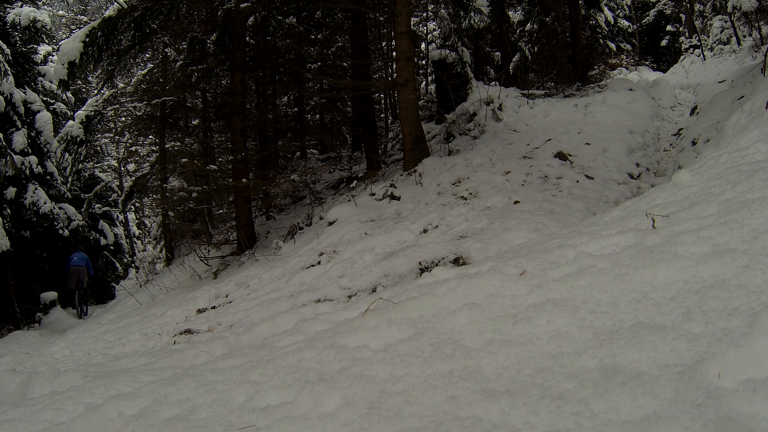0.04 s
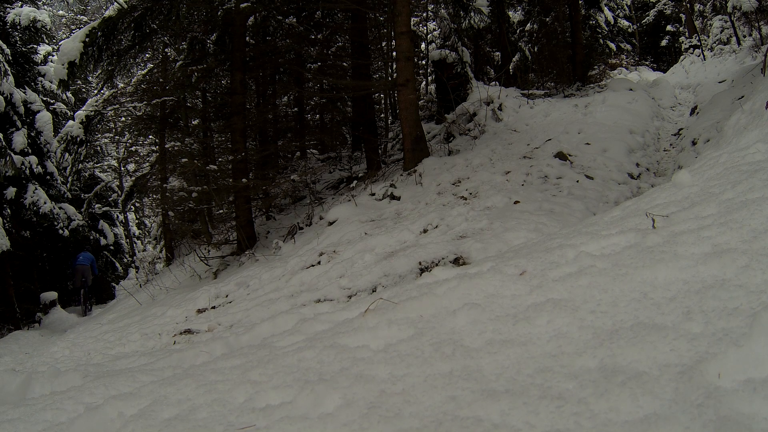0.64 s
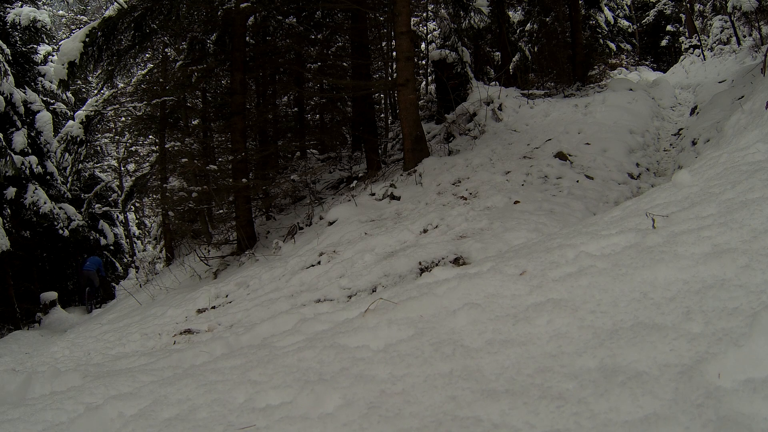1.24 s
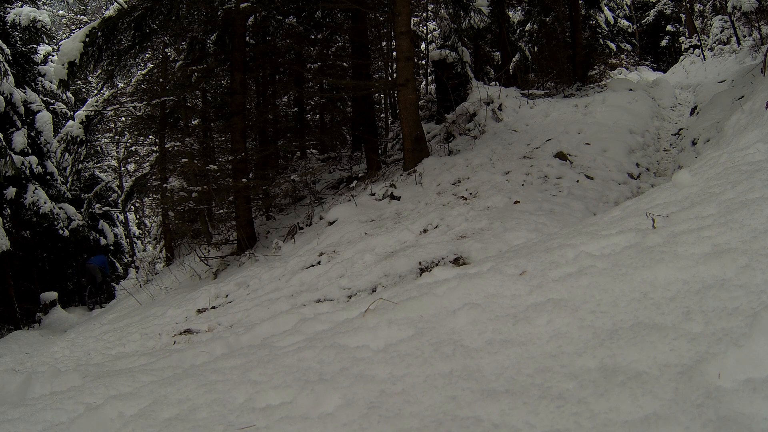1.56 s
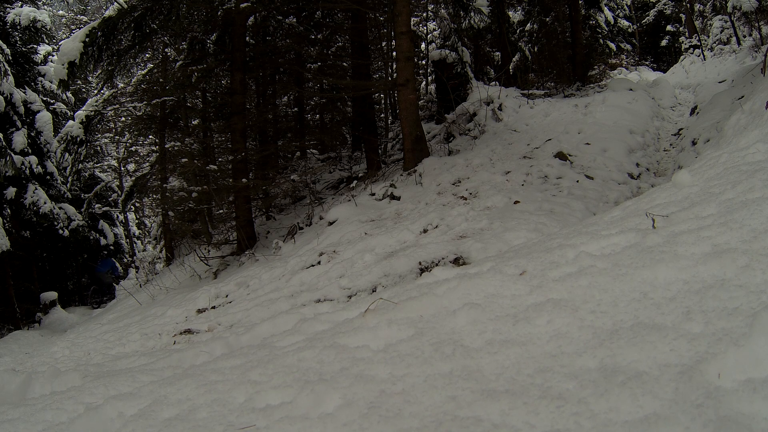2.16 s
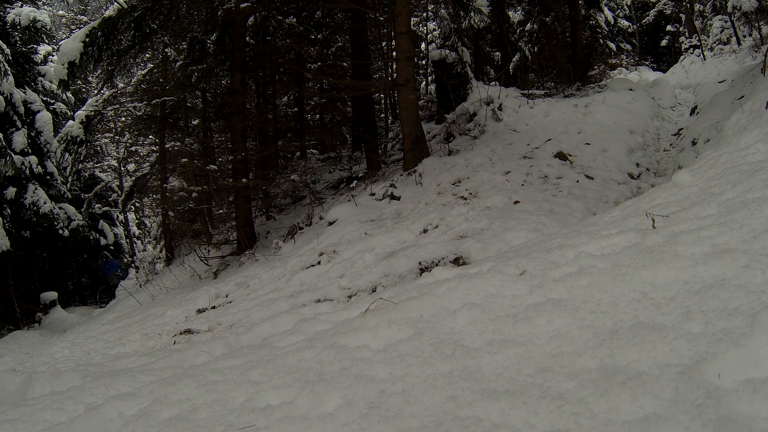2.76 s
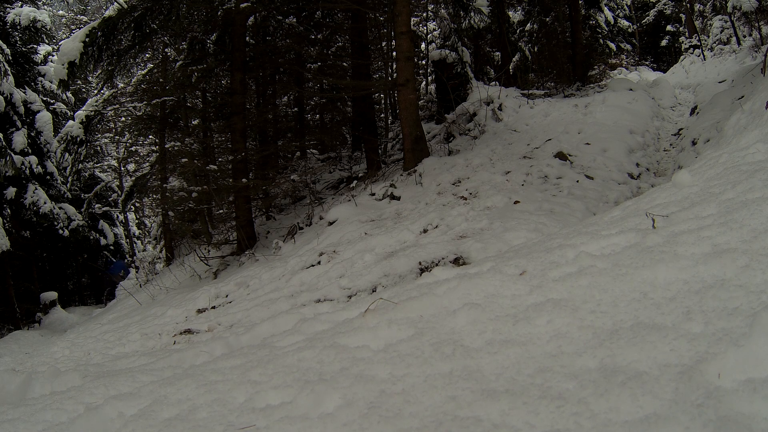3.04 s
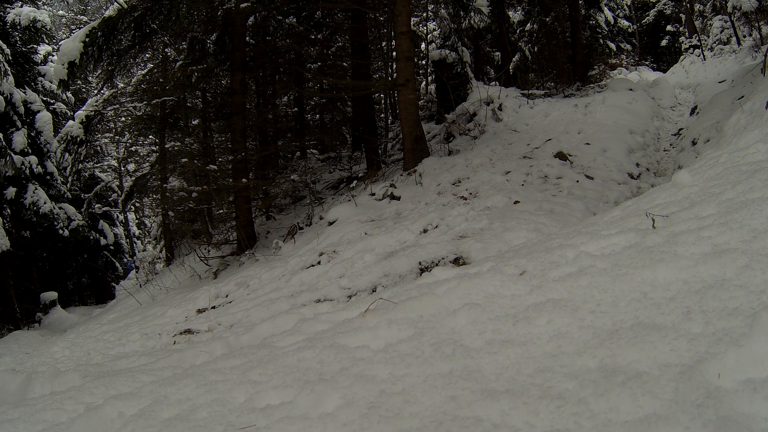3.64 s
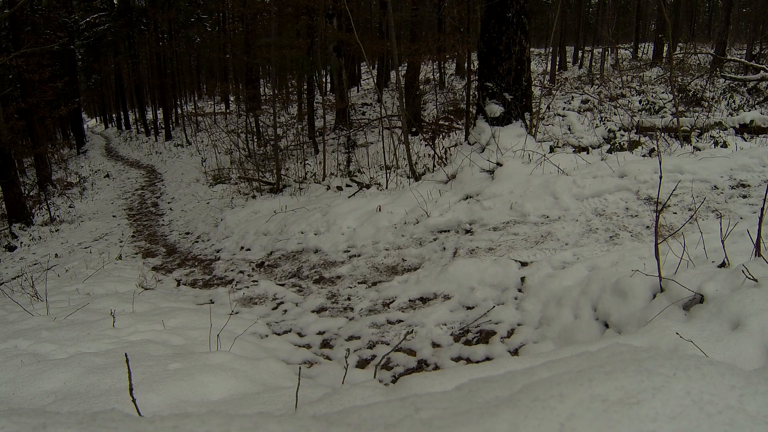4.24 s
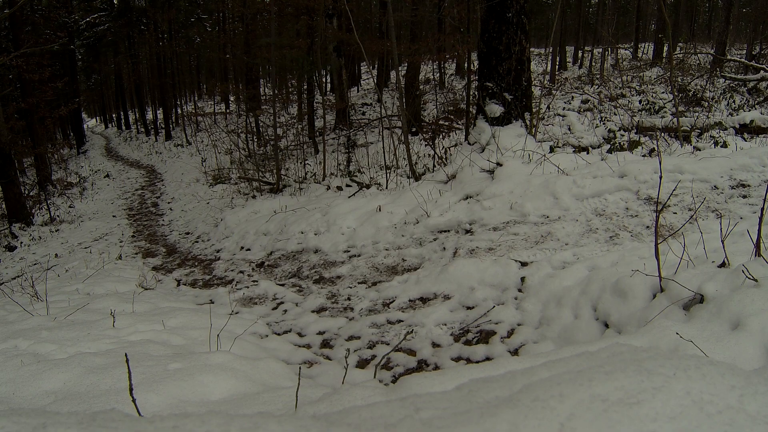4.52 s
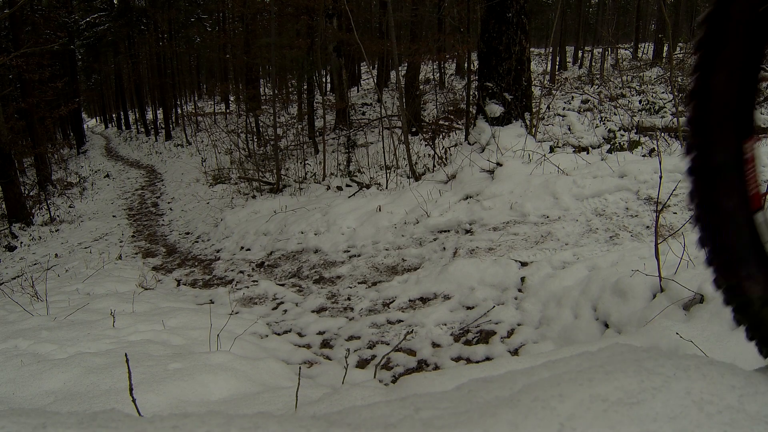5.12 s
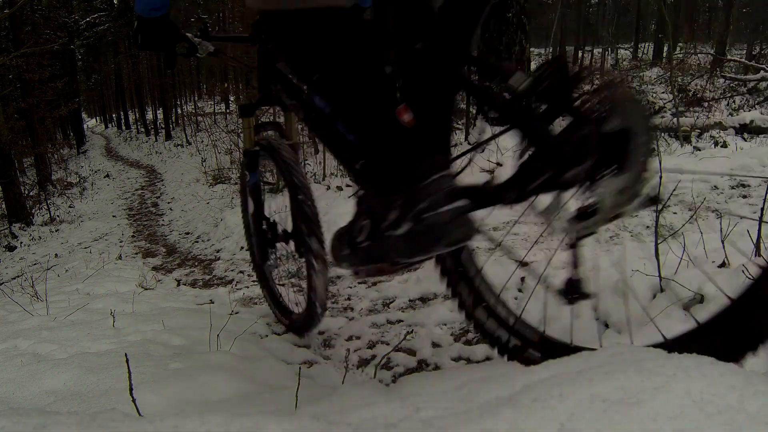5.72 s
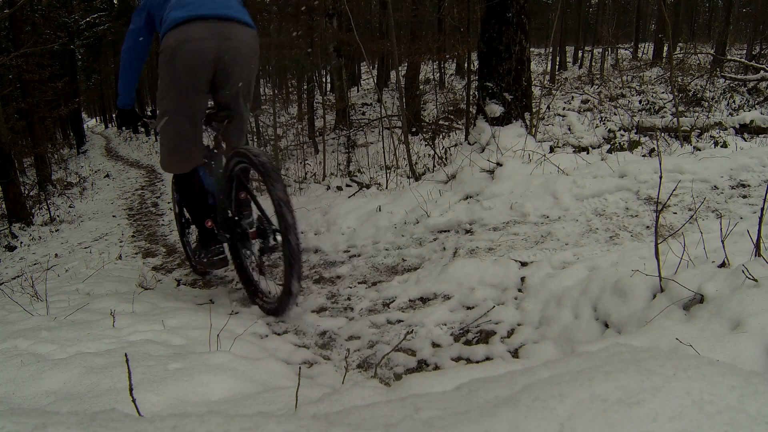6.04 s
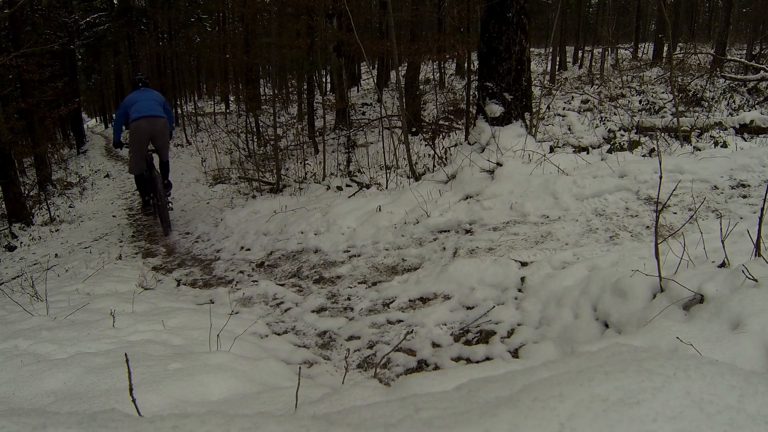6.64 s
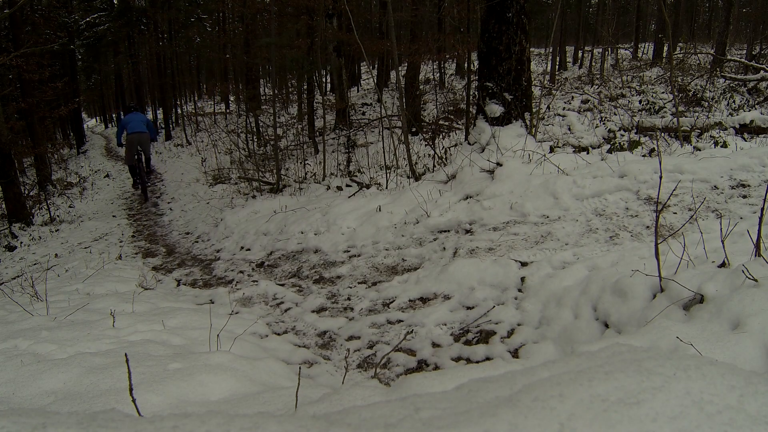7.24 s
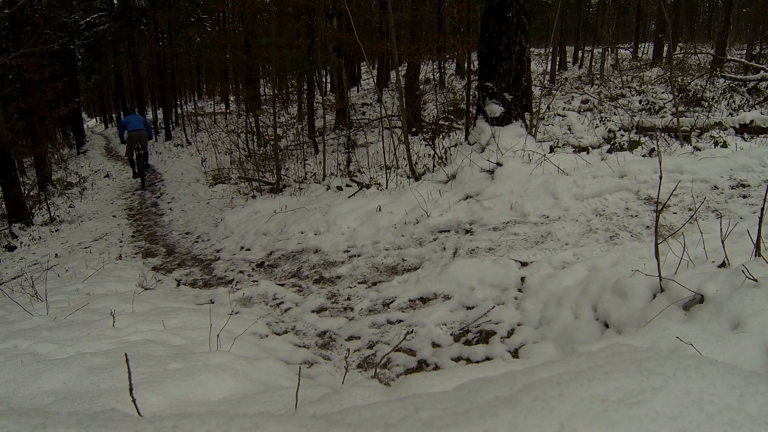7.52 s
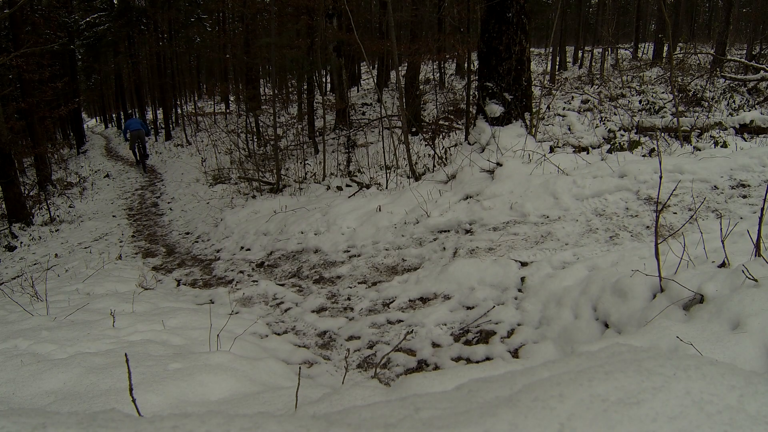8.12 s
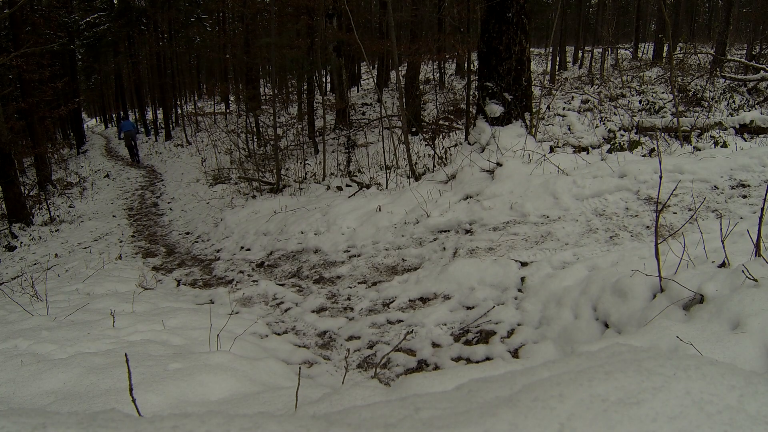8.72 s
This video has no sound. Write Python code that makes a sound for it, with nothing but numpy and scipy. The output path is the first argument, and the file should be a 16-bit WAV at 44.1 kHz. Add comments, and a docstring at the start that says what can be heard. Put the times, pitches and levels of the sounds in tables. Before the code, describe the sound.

A soft, low hush of still forest air runs throughout. A very faint high trill sounds from about 0.2 to 1.1 seconds, and a distant mountain bike rattles weakly until nearly 3 seconds. At about 3.8 seconds, nearby tyres start crunching through deep snow, growing louder, with many muffled pops and a couple of light clacks. From 5.3 to 6 seconds the bike passes right beside the microphone: the wheels land in several deep thumps, the heaviest near 5.9, while the chain slaps and jingles and the frame and brake disc ring briefly. A short, hollow tyre drone, ticks of grit and two softer thumps follow until about 6.5 seconds. The bike then coasts away on packed snow, its crackling quieter, with a run of light chain clacks around 7.5 to 8.4 seconds and soft crunches until the end, near 9 seconds.

```python
"""A quiet winter forest, a thin trill and a mountain bike rattling faintly far away; then a bike rolls up on
snow, thuds over a hump right beside the listener and coasts off down a trodden track.
The crunch is a mass of tiny fractures under the tread, with pops where pockets of snow collapse.
The wheels land with deep, sagging thumps; chain and frame clack, jingle and ring at the bumps."""
import sys
import numpy as np
from scipy import signal
from scipy.fft import rfft, irfft
from scipy.io import wavfile
from scipy.ndimage import uniform_filter1d

SR = 44100
rng = np.random.default_rng(int(sys.argv[2]) if len(sys.argv) > 2 else 0)


def transcribe(signal):
    """Save signal, clipped to [-1, 1], as a 16-bit WAV file at the path in sys.argv[1]."""
    frames = np.atleast_2d(signal).T
    limited = np.clip(frames, -1, 1)
    pcm = np.round(limited * 32767).astype(np.int16)
    wavfile.write(sys.argv[1], SR, pcm)


N = 386757
TIME = np.arange(N) / SR

# chain and frame knocking at the hard bumps:
# (time [s], clack level [dB], clack pitch [Hz], jingle level [dB], ring level [dB], ring centre [Hz])
KNOCKS = [(4.186, -44, 1750, -57, -56, 3500), (4.461, -39, 1860, -66, -47, 3000),
          (5.269, -32, 1900, -44, -52, 5150), (5.31, -35, 1610, -39.5, -33, 3180),
          (5.354, -30, 1890, -41, -42.5, 5150), (5.454, -38, 1900, -46, -48, 5000),
          (5.491, -44, 1800, -57, -56, 5000), (5.52, -24, 1650, -41.5, -34, 3200),
          (5.562, -37, 1750, -50.5, -50, 5400), (5.77, -31, 1700, -39, -44, 4900),
          (5.801, -26, 2300, -47, -45, 3200), (5.824, -30, 1600, -44, -48, 3200),
          (5.886, -20, 1600, -42, -30, 3600), (5.894, -24.5, 1600, -45, -27, 3670),
          (5.912, -38, 1900, -38, -46, 5150), (5.938, -28, 1900, -35, -38, 5400),
          (5.95, -21.5, 1950, -42, -26, 3020), (6.044, -28, 2350, -37.5, -29, 4500),
          (6.203, -31.5, 1650, -56, -50, 4900), (6.393, -34, 1750, -60, -45, 3600),
          (6.777, -40, 1740, -72, -56, 2900), (7.56, -41.5, 1800, -57, -57, 5400),
          (7.647, -43, 1900, -61, -47.5, 3550), (7.72, -43.5, 1900, -68, -56, 5400),
          (7.799, -40.5, 1900, -68, -49, 3570), (7.889, -35, 1950, -55, -44, 3550),
          (7.973, -37.5, 2010, -55, -43, 3550), (8.048, -43, 1900, -61, -52, 3550),
          (8.413, -43, 1800, -70, -52, 3550)]
# tone of the crust crackling on fresh snow: (frequency [Hz], relative level [dB])
FRESH_CRUST = [(600, -16), (1300, -9), (1550, 0), (1750, 3.5), (2150, -4.5), (2550, -11), (3150, -10),
               (3450, -22.5), (3900, -31.5), (5500, -42), (12000, -63)]


def from_db(db):
    """Decibels to gain."""
    return 10 ** (np.asarray(db) / 20)


def rms_one(x):
    """Scale to unit rms."""
    return x / np.sqrt(np.mean(x ** 2) + 1e-20)


def add(out, s, sound):
    """Mix a short sound in at time s."""
    i = max(0, round(s * SR))
    out[i:i + len(sound)] += sound[:N - i]


def butter(x, order, hz, kind="band"):
    """Butterworth filter, band-pass by default."""
    return signal.sosfilt(signal.butter(order, hz, kind, fs=SR, output="sos"), x)


def colour(x, spectrum, size=4096):
    """Minimum-phase EQ through (Hz, dB) points; white noise keeps its power."""
    hz, db = np.transpose(spectrum)
    grid = np.maximum(np.fft.rfftfreq(size, 1 / SR), 1)
    gain = from_db(np.interp(np.log(grid), np.log(hz), db))
    cepstrum = irfft(np.log(gain))
    cepstrum[1:size // 2] *= 2
    cepstrum[size // 2 + 1:] = 0
    response = irfft(np.exp(rfft(cepstrum)))
    return signal.oaconvolve(x, response / np.linalg.norm(response))[:N]


def shifted(spectrum, ratio):
    """The same spectrum, moved in pitch."""
    return [(hz * ratio, db) for hz, db in spectrum]


def drift(per_s):
    """Smooth random wander of rms 1."""
    knots = rng.standard_normal(N // 20)
    return rms_one(np.interp(TIME * per_s, np.arange(len(knots)), knots))


def wandering(x, spectrum, octaves=0.11):
    """An EQ that slides up and down at random: each clump of snow breaks at its own pitch."""
    place = np.clip(drift(per_s=60), -1, 1)
    return sum(colour(x * np.maximum(0, 1 - abs(place - k)), shifted(spectrum, 2 ** (k * octaves)))
               for k in (-1, 0, 1))


def grains(per_s, spread_db, hiss):
    """Random tiny clicks, many weak and a few strong, merging into a hiss; rms 1."""
    sizes = from_db(spread_db * np.minimum(rng.exponential(1, N), 4))
    clicks = (rng.random(N) < per_s / SR) * sizes * rng.choice([-1, 1], N)
    return rms_one(rms_one(clicks) + hiss * rng.standard_normal(N))


def swell(t, rise_s, decay):
    """Envelope of peak 1: a soft attack on the given decay curve."""
    shape = (1 - np.exp(-(t / rise_s) ** 2)) * decay
    return shape / shape.max()


def burst(rise_s, decay_s, tail_db, tail_s):
    """A rush of tiny contacts that swells, dies quickly and leaves a weak tail."""
    t = TIME[:SR // 6]
    decay = np.exp(-t / decay_s) + from_db(tail_db) * np.exp(-t / tail_s)
    return swell(t, rise_s, decay) * rng.standard_normal(len(t))


def ring(t, hz, t60):
    """A struck mode: a dying sine."""
    return np.sin(2 * np.pi * hz * t) * from_db(-60 * t / t60)


def forest_air(level_db=-54):
    """The bed: still air, a soft hush weighted to the lows."""
    # tone of the hush: (frequency [Hz], relative level [dB])
    hush = [(20, 1.5), (50, 2.5), (100, -6.0), (280, -14.0), (430, -20.0), (900, -22.5), (1350, -28.5),
            (1800, -28.5), (2400, -31.5), (2950, -29.5), (3700, -34), (7200, -39.5), (7950, -35),
            (8700, -42), (12500, -44.5), (15000, -47)]
    return from_db(level_db) * colour(rng.standard_normal(N), hush)


def whines(flutter_db=1.5):
    """A faint high hiss and a brief low whine: narrow bands of fluttering noise."""
    # rushes in the stillness: (start [s], end [s], centre [Hz], width [Hz], level [dB])
    rushes = [(1.127, 2.05, 6700, 1800, -75), (2.37, 2.47, 1020, 90, -72.5)]
    out = np.zeros(N)
    for start, end, hz, width, db in rushes:
        gate = uniform_filter1d(1.0 * ((TIME > start) & (TIME < end)), size=900)
        flutter = from_db(flutter_db * drift(per_s=40))
        rush = butter(rng.standard_normal(N), 2, [hz - width / 2, hz + width / 2])
        out += from_db(db) * gate * rms_one(flutter * rush)
    return out


def trill(start_s=0.23, end_s=1.13, pitch_hz=4490, waver_hz=60, pips_per_s=10.1, level_db=-76):
    """A loose chain of soft, high pips."""
    beat = np.pi * pips_per_s * (TIME - start_s) + .5 * drift(pips_per_s)
    pips = np.sqrt(abs(np.sin(beat))) * (TIME > start_s) * (TIME < end_s)
    hz = pitch_hz + waver_hz * drift(per_s=150)
    return from_db(level_db) * pips * np.sin(2 * np.pi * np.cumsum(hz) / SR)


def far_bike(band_ratio=1.39, frame_hz=1760, frame_width_hz=120, frame_db=2.5):
    """Each jolt is a soft swell of small ticks, blurred by distance; the frame rings through them."""
    # jolts and skids: (time [s], level [dB], centre [Hz], rise [s], decay [s])
    jolts = [(.02, -69.5, 2000, 0.0074, 0.2), (.311, -63, 1930, 0.0016, .022),
             (.538, -58, 2000, 0.0017, .009), (.556, -67, 1900, .002, .024),
             (1.235, -70, 1880, .012, 0.066), (1.58, -66.5, 2370, 0.1, 0.068),
             (2.415, -59.5, 745, .04, 0.025), (2.6, -68, 2350, 0.015, 0.037)]
    out, t = np.zeros(N), TIME[:SR]
    ticks = grains(per_s=220, spread_db=2, hiss=0.65)
    for s, db, hz, rise_s, decay_s in jolts:
        rattle = rms_one(butter(ticks[round(s * SR):][:SR], 2, [hz / band_ratio, hz * band_ratio]))
        add(out, s, from_db(db) * swell(t, rise_s, np.exp(-t / decay_s)) * rattle)
    frame = signal.iirpeak(frame_hz, frame_hz / frame_width_hz, fs=SR)
    return out + from_db(frame_db) * signal.lfilter(*frame, out)


def tree_echo(x, send_db=-17, delay_s=.008, decay_s=0.042):
    """Trunks scatter back a weak, dull tail; the snow swallows the rest."""
    t = TIME[:SR // 2]
    tail = rng.standard_normal(len(t)) * np.exp(-t / decay_s) * (t > delay_s)
    dull_tail = butter(tail / np.linalg.norm(tail), 1, [200, 3500])
    return from_db(send_db) * signal.oaconvolve(x, dull_tail)[:N]


def tread_drumming(band_hz=(136, 293)):
    """Off the hump, the rear tyre's knobs slap the hard track unevenly: a short, hollow drone."""
    # fader curve of the drone: (time [s], level [dB])
    fader = [(5.86, -77), (5.93, -38), (6.04, -37.5), (6.15, -52.5), (6.18, -41.5), (6.25, -40.5),
             (6.42, -54), (6.6, -75)]
    times, db = np.transpose(fader)
    level = from_db(np.interp(TIME, times, db)) * (TIME > times[0])
    return level * rms_one(butter(rng.standard_normal(N), 3, band_hz))


def grit(cycles=3.5, gain=2):
    """Grit flicks against the bike; each grain hits once and is dead within a few cycles."""
    # dry ticks: (time [s], level before gain [dB], pitch [Hz])
    ticks = [(5.7252, -27, 4150), (5.966, -27, 5000), (6.301, -34.5, 4500), (6.399, -39, 4600),
             (6.489, -41, 4400)]
    out = np.zeros(N)
    for s, db, hz in ticks:
        add(out, s, gain * from_db(db) * ring(TIME[:SR // 100], hz, cycles / hz))
    return out


def brake_disc(knock_s=5.801):
    """One knock sets wheel and brake disc singing."""
    # their modes: (frequency [Hz], level [dB], t60 [s])
    modes = [(506, -31.5, 0.25), (2175, -33.5, 0.24), (2370, -25.5, 0.042), (3150, -40, 0.21),
             (3456, -47, 0.14), (8240, -48, .08)]
    out = np.zeros(N)
    add(out, knock_s, sum(from_db(db) * ring(TIME[:SR // 2], hz, t60) for hz, db, t60 in modes))
    return out


def frame_ring(focus_octaves=0.084, spread_db=1, lag_s=.002, detune=.012, chatter=0.5):
    """Where the chain lands decides which modes ring most; still touching, it detunes and roughens them."""
    # modes of the frame: (frequency [Hz], relative level [dB], t60 [s])
    modes = [(2900, -3, 0.061), (3210, -2, 0.038), (3540, -2, 0.029), (3699, -6, 0.042), (3960, -3, 0.018),
             (4420, -5.5, 0.051), (4930, -3, 0.05), (5170, 1.5, 0.024), (5420, -6.5, 0.028),
             (5510, -13, 0.076), (7780, -4, 0.036), (8360, 1, 0.033), (10700, -3, 0.028)]
    out, t = np.zeros(N), TIME[:SR // 8]
    for hz, db, t60 in modes:
        mode = np.zeros(N)
        for s, _, _, _, ring_db, centre_hz in KNOCKS:
            share = 1 / np.hypot(1, np.log2(hz / centre_hz) / focus_octaves)
            strength = from_db(ring_db + db + spread_db * rng.standard_normal()) * rng.choice([-1, 1])
            detuned_hz = hz * (1 + detune * rng.standard_normal())
            add(mode, s + lag_s, share * strength * ring(t, detuned_hz, t60))
        out += mode * (1 + chatter * drift(per_s=400)) / np.hypot(1, chatter)
    return out


def chain_slap(tone_peak_hz=1750, links_per_s=4500, trim_db=-0.74):
    """Chain links land in a quick, ragged run: a dull clack and a bright jingle."""
    # tones of the clack and the jingle: (frequency [Hz], relative level [dB])
    clack_tone = [(300, -19), (1100, -10), (1750, 4.5), (2300, -1.5), (2800, -6), (3520, -9.5), (4500, -24),
                  (5350, -21), (6800, -37), (15000, -54)]
    jingle_tone = [(1500, -50), (3500, 4.5), (5200, 8.5), (6800, -2), (8300, 11), (9400, -1.5),
                   (10500, 0.5), (12500, -11), (15000, -14)]
    dull, bright = np.zeros((2, N))
    for s, clack_db, clack_hz, jingle_db, _, _ in KNOCKS:
        clack = from_db(clack_db) * burst(rise_s=0.0016, decay_s=0.0018, tail_db=-21.5, tail_s=0.028)
        add(dull, s, colour(clack, shifted(clack_tone, clack_hz / tone_peak_hz)))
        jingle = from_db(jingle_db) * burst(rise_s=0.0028, decay_s=0.0023, tail_db=-30.5, tail_s=0.026)
        links = rng.random(len(jingle)) < links_per_s / SR
        add(bright, s - .001, jingle * rms_one(links + 0.12))
    return from_db(trim_db) * (dull + colour(bright, jingle_tone))


def wheel_thumps(sag=0.4, sag_s=.015, rise_s=0.0042, thud_db=-11):
    """A deep bounce whose pitch sags as the load eases; the casing booms and squashed snow thuds."""
    # wheels landing: (time [s], level [dB], mid-sweep pitch [Hz], t60 [s], casing boom level [dB])
    landings = [(5.306, -19.5, 49.7, 0.065, -23.5), (5.362, -26, 34, 0.15, -50),
                (5.516, -15, 46.6, 0.12, -28), (5.733, -18, 44, 0.16, -42), (5.8794, -8.5, 54.7, 0.12, -38),
                (6.17, -33, 45, .1, -42), (6.225, -28, 38, 0.14, -44)]
    # tone of squashed snow: (frequency [Hz], relative level [dB])
    thud_tone = [(60, -12.5), (160, 3.5), (260, -1.5), (360, -5), (520, -3.5), (1000, -7.5), (1700, -3),
                 (2600, -29), (5000, -52)]
    out, squash = np.zeros((2, N))
    t = TIME[:SR // 3]
    for s, db, hz, t60, boom_db in landings:
        sagging_hz = hz * (1 - sag + 2 * sag * np.exp(-t / sag_s))
        bounce = np.sin(2 * np.pi * np.cumsum(sagging_hz) / SR)
        add(out, s, from_db(db) * swell(t, rise_s, from_db(-60 * t / t60)) * bounce)
        add(out, s + rise_s, from_db(boom_db) * ring(t, hz=144, t60=0.063))
        thud = burst(rise_s=0.0022, decay_s=0.013, tail_db=-12, tail_s=0.023)
        add(squash, s, from_db(db + thud_db) * thud)
    return out + colour(squash, thud_tone)


def grind_db(s):
    """How hard the tyres grind the snow at time s, as heard from the trailside."""
    # fader curve of the grind: (time [s], level [dB])
    fader = [(3.85, -57), (3.92, -57), (4.01, -51), (4.15, -48.5), (4.26, -48.5), (4.38, -47.5),
             (4.52, -47), (4.66, -44.5), (5.07, -44), (5.45, -47.5), (5.66, -48), (5.73, -43.5),
             (5.86, -47), (5.94, -39), (6.01, -41.5), (6.14, -48.5), (6.41, -47), (6.75, -51.5),
             (7.65, -54), (8.05, -54), (8.52, -57.5), (8.77, -51.5)]
    return np.interp(s, *np.transpose(fader))


def small_pops(start_s=4.0, end_s=5.3, per_s=36, over_grind_db=9, centre_hz=850, spread_octaves=0.84):
    """Small pockets give way in deep snow, one at random in each beat: rows of (s, dB, Hz)."""
    beats = np.arange(np.ceil((end_s - start_s) * per_s))
    times = start_s + (beats + rng.random(len(beats))) / per_s
    return [(s, grind_db(s) + over_grind_db, centre_hz * 2 ** (spread_octaves * rng.standard_normal()))
            for s in times[times < end_s]]


def snow_pops(width_cycles=0.33, crumble_db=-16, after_s=0.003014, muffle_hz=1520):
    """A collapsing pocket is one quick suck and push of air, muffled by snow; then the crust crumbles."""
    # the biggest pockets under the tread: (time [s], level [dB], pitch [Hz])
    big_pops = [(3.99, -31, 520), (4.036, -34, 900), (4.0737, -24, 1030), (4.103, -24, 1600),
                (4.1458, -19.5, 650), (4.1591, -19, 860), (4.1886, -20.5, 620), (4.285, -26.5, 730),
                (4.3581, -18, 1550), (4.41, -28, 1300), (4.431, -26.5, 454), (4.4627, -13, 2000),
                (4.473, -23.5, 600), (4.5585, -27, 700), (4.601, -22.5, 1710), (4.72, -27, 820),
                (4.7505, -17, 716), (4.7616, -15.5, 636), (4.8012, -15, 1080), (4.8079, -13.5, 640),
                (4.8443, -13.5, 730), (4.8597, -19.5, 597), (4.903, -26.5, 418), (5.029, -20, 810),
                (5.0921, -17, 760), (5.167, -28, 500), (5.177, -26.5, 603), (5.2247, -17, 815),
                (5.306, -9.5, 760), (5.311, -12, 750), (5.736, -14, 623), (5.739, -13, 293),
                (5.746, -9.5, 1340), (5.9541, -11.5, 835), (5.992, -18.5, 900), (6.0222, -17.5, 860),
                (6.2671, -18, 1350), (6.337, -18, 1200), (6.3955, -19, 1450), (6.412, -19, 1200),
                (6.733, -30.5, 800)]
    air, crumbs = np.zeros((2, N))
    t = np.arange(-SR // 200, SR // 200) / SR
    pops = big_pops + small_pops()
    # the snow gives way a second time, softer and lower
    after_pops = [(s + after_s * (.5 + rng.random()), db - 10, hz * 0.72) for s, db, hz in pops]
    for s, db, hz in pops + after_pops:
        pulse = np.sin(2 * np.pi * hz * t) * np.exp(-.5 * (hz * t / width_cycles) ** 2)
        add(air, s + t[0], from_db(db) * pulse)
        crumble = burst(rise_s=0.00015, decay_s=0.0011, tail_db=-14.5, tail_s=0.014)
        add(crumbs, s - .001, from_db(db + crumble_db) * crumble)
    return butter(air, 1, muffle_hz, "low") + colour(crumbs, FRESH_CRUST)


def distance_db(s, pass_s=5.895, closest_m=0.47, speed_m_per_s=3.42):
    """Level change with distance: 0 as the rear wheel goes by, negative either side."""
    return -20 * np.log10(np.hypot(1, speed_m_per_s * (s - pass_s) / closest_m))


def tyres(start_s=3.838, hump_s=(5.57, 5.71), clump_db=2.5):
    """The tread breaks snow in clumps, each lifting crunch, crackle and spray, over a ground rumble."""
    # a tyre breaking right through the crust: (time [s], crunch level [dB], crackle level [dB], decay [s])
    breaks = [(3.972, -43.5, -66, 0.034), (4.03, -46.5, -51, 0.025), (4.068, -41, -52, 0.018),
              (4.135, -36.5, -58, 0.018), (4.176, -37, -38.5, 0.0082), (4.254, -41, -44.5, 0.011),
              (4.35, -44, -42, 0.022), (4.459, -38, -37, 0.011), (4.54, -49, -36, 0.004),
              (4.8, -35, -40.5, 0.03), (4.84, -41, -39, .01), (5.024, -34, -46, 0.027),
              (5.048, -35, -44, 0.022), (5.303, -24, -29, 0.006), (5.692, -35.5, -35.5, 0.034),
              (5.95, -25, -35, 0.01), (6.236, -38.5, -37, 0.0099), (6.295, -44, -40, .01),
              (6.342, -37, -40, 0.023), (6.463, -45, -41.5, .014), (6.545, -51, -45, 0.03),
              (6.605, -51, -43.5, 0.012), (6.672, -53, -45.5, 0.022), (6.73, -45.5, -49, 0.029),
              (6.772, -47.5, -47, 0.033), (6.95, -49, -44.5, 0.016), (6.985, -42, -42, 0.021),
              (7.022, -44.5, -42, 0.017), (7.105, -50, -45.5, .016), (7.185, -48.5, -48, 0.025),
              (7.265, -49, -49, 0.017), (7.428, -55, -49, 0.0082), (7.478, -52, -46, 0.01),
              (7.585, -46.5, -43, 0.019), (7.777, -44, -42.5, 0.012), (8.02, -52.5, -47, 0.037),
              (8.25, -45.5, -45, 0.014), (8.41, -50.5, -50, .014), (8.662, -49, -47.5, .014),
              (8.69, -45.5, -43, 0.016), (8.725, -45, -46.5, 0.011)]
    # tones of deep fresh snow, trodden track and ground: (frequency [Hz], relative level [dB])
    fresh_crunch = [(120, -13), (170, -3), (220, -7), (280, 3), (430, 2), (600, -0.5), (820, 0), (1050, -5),
                    (1350, -16), (2500, -33), (5000, -48.5)]
    fresh_spray = [(2500, -3.5), (4000, -8), (4550, 7), (5150, -5.5), (6100, 2.5), (7100, -14), (8250, 2.5),
                   (9400, -9), (10400, -4.5), (12000, -33), (15000, -20)]
    track_crunch = [(120, -11), (230, -1.5), (400, -5.5), (600, -4.5), (800, 0), (1000, -1), (1300, -5.5),
                    (2500, -13), (5000, -66.5)]
    track_crust = [(600, -28.5), (1250, -4.5), (1500, 3), (1680, 6), (1950, -0.5), (2200, -7.5),
                   (2600, -11), (3600, -15), (4300, -26.5), (5300, -32), (6500, -36), (12000, -57)]
    track_spray = [(2500, -15), (3700, 8.5), (4400, 0.5), (5200, 3.5), (7000, -15), (8200, -4), (9300, -17),
                   (10400, -10), (12000, -25), (15000, -17)]
    ground_tone = [(25, 1), (55, 7), (90, 1.5), (130, -0.5), (180, -3), (250, -1), (330, -8), (450, -26.5),
                   (900, -55)]
    grind, distance = grind_db(TIME), distance_db(TIME)
    clumps = rms_one(from_db(clump_db * drift(per_s=115)))
    # each layer rides the grind with its own offset in dB and its own share of the distance curve
    crunch = from_db(grind + 2 + 0.17 * distance) * clumps * grains(per_s=800, spread_db=3, hiss=0.79)
    crackle = from_db(grind - 4 - 0.15 * distance) * clumps * grains(per_s=700, spread_db=2, hiss=0.67)
    spray = from_db(grind - 13.5 + 0.39 * distance) * clumps * grains(per_s=700, spread_db=4, hiss=0.6)
    on_track = np.interp(TIME, hump_s, [0, 1])
    rumble_db = -42.5 + 0.62 * distance + 3 * on_track  # hard track carries it better than deep snow
    rumble = from_db(rumble_db) * colour(rng.standard_normal(N), ground_tone)
    for s, crunch_db, crackle_db, decay_s in breaks:
        rush = burst(rise_s=0.0031, decay_s=decay_s, tail_db=-19, tail_s=0.049)
        add(crunch, s, from_db(crunch_db) * rush)
        add(crackle, s, from_db(crackle_db) * rush)
    fresh = wandering(crunch, fresh_crunch) + colour(crackle, FRESH_CRUST) + colour(spray, fresh_spray)
    track = colour(crunch, track_crunch) + colour(crackle, track_crust) + colour(spray, track_spray)
    snow = from_db(1) * (1 - on_track) * fresh + from_db(1.5) * on_track * track
    return (snow + rumble) * (TIME > start_s)


def scene():
    """The near bike and its echo over the far bike and the still forest, in mono."""
    bike = tyres() + snow_pops() + wheel_thumps()
    bike += chain_slap() + frame_ring() + brake_disc() + grit() + tread_drumming()
    background = forest_air() + whines() + trill() + far_bike()
    return (background + bike + tree_echo(bike))[None]


def record(dry, low_cut_hz=14, high_cut_hz=15400):
    """Roll off the deepest bass and cut the top steeply."""
    high_cut = signal.ellip(10, .2, 80, high_cut_hz, fs=SR, output="sos")
    return signal.sosfilt(high_cut, butter(dry, 1, low_cut_hz, "high"))


dry = scene()
out = record(dry)
transcribe(out)
```